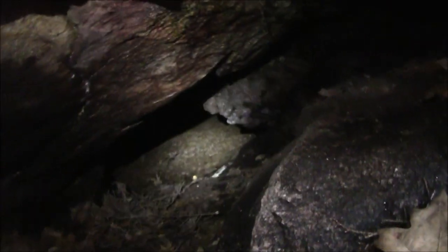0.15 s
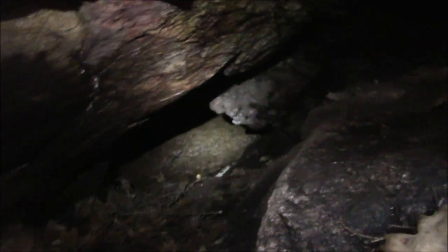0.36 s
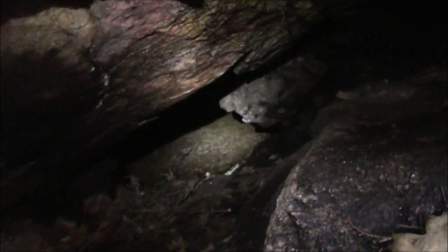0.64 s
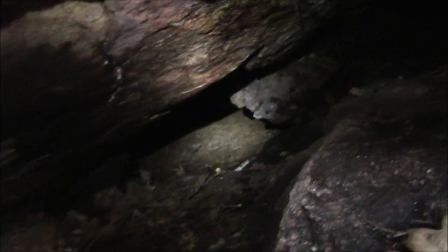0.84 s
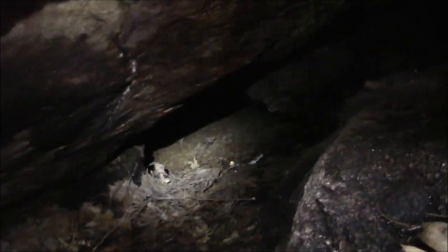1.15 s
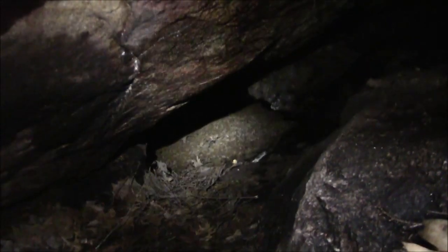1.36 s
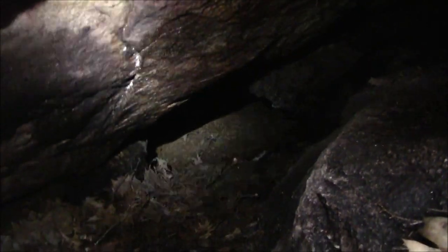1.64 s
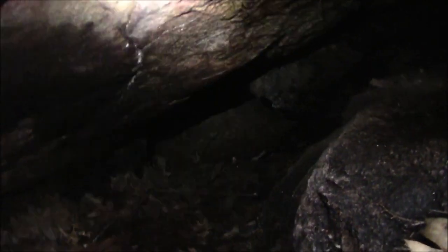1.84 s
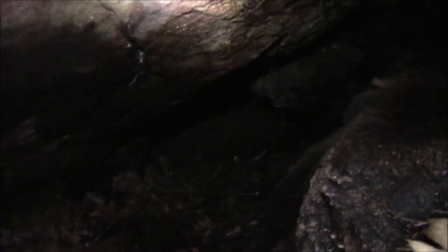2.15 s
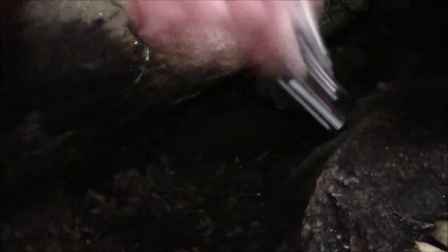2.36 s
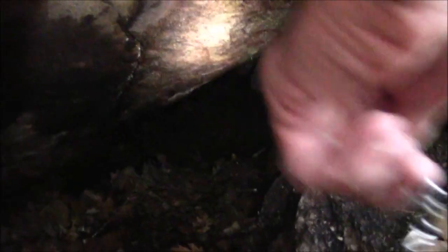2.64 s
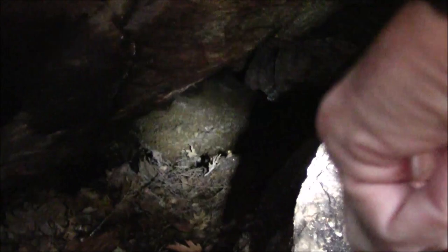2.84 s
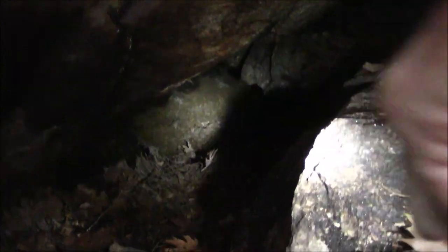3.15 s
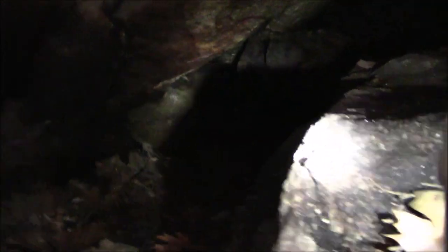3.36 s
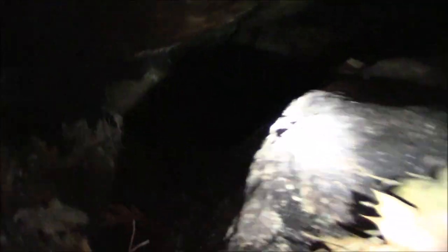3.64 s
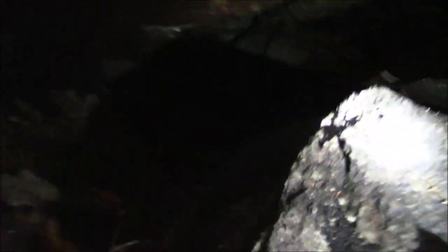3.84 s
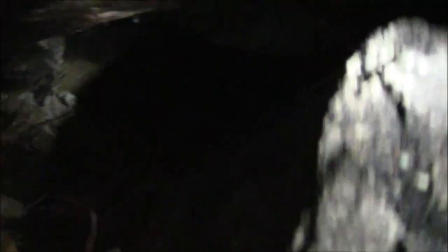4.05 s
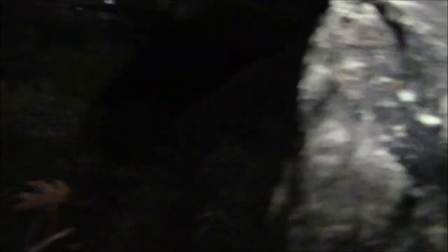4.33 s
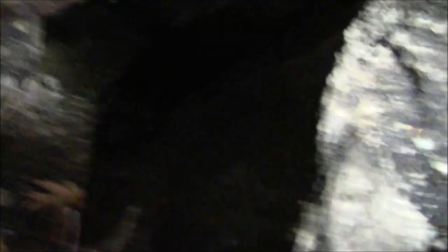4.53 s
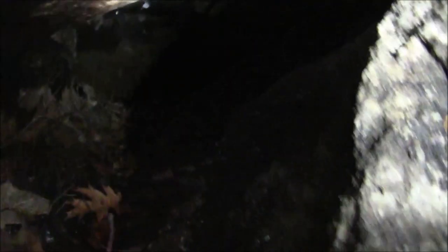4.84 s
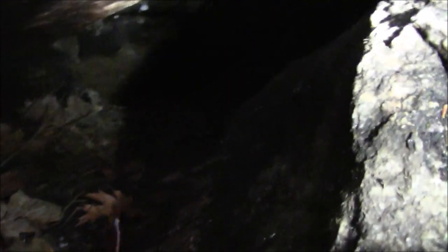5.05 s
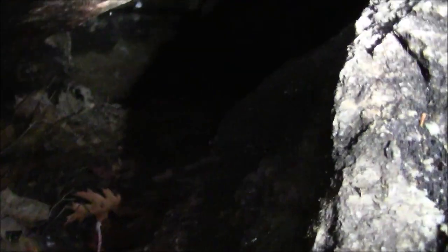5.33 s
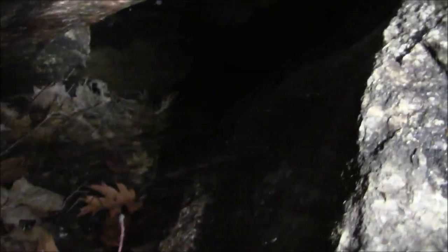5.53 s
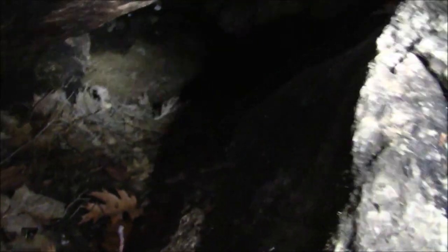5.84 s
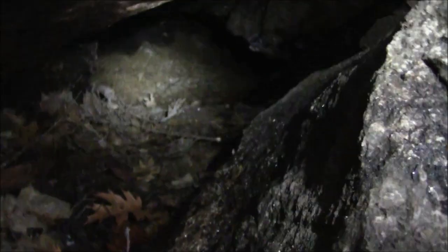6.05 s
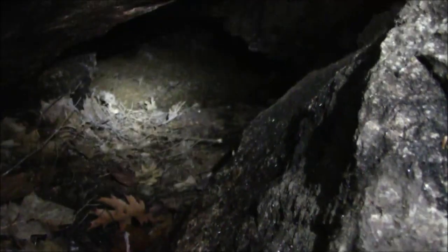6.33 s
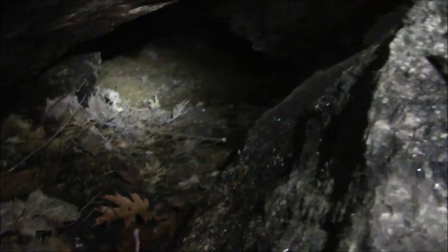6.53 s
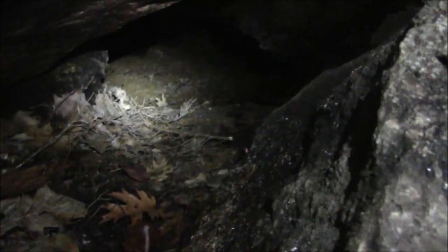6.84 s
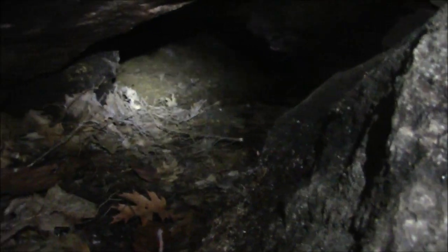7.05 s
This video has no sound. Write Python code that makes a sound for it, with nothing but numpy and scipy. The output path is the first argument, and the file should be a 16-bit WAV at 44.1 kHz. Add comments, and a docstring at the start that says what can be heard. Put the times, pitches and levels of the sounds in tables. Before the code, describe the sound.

A quiet, dull wash of woodland air runs throughout. Close to the microphone, dry leaves give a faint crackle and a few small snaps in the first half second, then stay almost still until about 1.6 s. From 1.9 to 2.4 s, short rustles bring brittle snaps, light hollow stick knocks and soft low thuds. Sharp little stem clicks keep popping until about 3.1 s while low rubbing grows. At 3.4 s the leaves are pushed hard: a loud, dense, crisp crush with hissy sliding, peaking near 3.85 s and continuing to about 4.35 s, with bright cracks, another hollow knock and heavy dull thumps, one leaning right near 4.1 s. It falls away by 4.7 s. Smaller crackles and snaps follow until 5.9 s, then sparse, thin ticks and faint stirring to 7.2 s. Rocks lend tight, brief reflections.

```python
"""At the mouth of a rock crevice in the woods, someone shifts about in dry leaves close by. Pressed leaves
crackle in swarms of tiny breaks, with a hiss where they slide over each other. Stems and stiff leaves snap
singly as short, ringing bursts; sticks knock as brief, fading tones. Soft thuds, of landing weight and of one
bump far to the right at 4.135 s, are made of a low tone and a puff of noise, and dull noise makes the
shuffling. The rocks add short echoes to the crackle, snaps and knocks; filtered noise is the steady wash of the
woods."""
import sys
import numpy as np
from scipy import signal
from scipy.fft import rfft, irfft, next_fast_len
from scipy.io import wavfile
from scipy.ndimage import uniform_filter1d

SR = 44100
rng = np.random.default_rng(int(sys.argv[2]) if len(sys.argv) > 2 else 0)


def store_pcm(level_fs):
    """Save levels as 16-bit WAV."""
    pcm = np.round(np.clip(level_fs, -1, 1) * 32767).astype(np.int16)
    wavfile.write(sys.argv[1], SR, np.atleast_2d(pcm).T)


N = 317079
TIME = np.arange(N) / SR

# tone of the distant woods: [f/Hz, relative level per hertz/dB]
WOODS_TONE = [(25, -14), (55, 0.5), (100, -6), (160, -1.5), (250, -9.5), (350, -7), (550, -11),
              (1000, -14.5), (2000, -20), (5000, -26), (10000, -30), (16000, -36)]
# stereo width of the woods: [f/Hz, side over mid/dB]
WOODS_WIDTH = [(60, -8), (200, -4), (1600, -6), (15000, -7)]
# low rubbing of the moving body: [t/s, level/dB]
SHUFFLE = [(0, -53), (1.3, -48), (1.7, -43.5), (2.3, -43), (3.3, -39), (4.1, -37), (4.45, -38.5),
           (4.7, -56), (7.19, -49.5)]
# tone of the rubbing: [f/Hz, relative level per hertz/dB]
GROUND_TONE = [(25, -2.5), (60, 0), (150, 0.5), (320, -3), (550, -13), (1200, -13), (4000, -47)]
# weight resting on the leaves, heaviest while the body moves across them: [t/s, crackle level/dB]
RESTING_WEIGHT = [(0.0, -50.5), (0.3, -53.5), (0.75, -59.5), (1.3, -60), (1.55, -52), (1.72, -52),
                  (2.07, -43.5), (2.5, -43), (3.36, -44), (3.48, -25), (3.8, -21.5), (4.0, -23.5),
                  (4.16, -22.5), (4.33, -29.5), (4.44, -36.5), (4.72, -42.5), (4.99, -50), (5.6, -55.5),
                  (7.19, -58.5)]
# separate shoves into the leaves:
# [start t/s, length/s, crackle level/dB, body over crackle/dB, fizz over crackle/dB]
SHOVES = [(0.093, 0.04, -49, -5, -14), (0.347, 0.094, -45.5, -2.5, -10), (1.618, 0.17, -45.5, -1.5, -9),
          (1.909, 0.036, -37.5, -1, -6.5), (1.958, 0.058, -28, -5, -7), (2.093, 0.22, -41, 3.5, -5),
          (2.282, 0.021, -34.5, -2, -1), (2.315, 0.092, -41, 0.5, -13), (2.601, 0.032, -35.5, -9, -6),
          (2.812, 0.074, -43, -7, -1), (3.16, 0.089, -46, -14, -2.5), (3.354, 0.11, -31.5, -3.5, -9),
          (3.462, 0.043, -24.5, -4.5, -11), (3.692, 0.052, -21, -5, -9), (3.843, 0.054, -15, -8.5, -5),
          (3.925, 0.032, -22, -2.5, -13), (4.006, 0.12, -21, -1, -3), (4.058, 0.032, -20.5, -2.5, -8),
          (4.469, 0.087, -33.5, -7, -4.5), (4.621, 0.024, -31, -7.5, -3.5), (4.682, 0.083, -40, -4.5, -5),
          (4.805, 0.089, -39, -15, -4.5), (4.903, 0.038, -33.5, -19, -1.5), (5.008, 0.052, -30.5, -11, -2),
          (5.078, 0.031, -36, -4.5, -6), (5.241, 0.059, -42, 1.5, -5.5), (5.406, 0.11, -44.5, 1, -5),
          (5.745, 0.056, -39, -4, -5), (5.814, 0.126, -35, 0.5, -3.5), (6.218, 0.03, -49, 3.5, -7),
          (6.502, 0.037, -44, 0, -6)]
# filter that colours the crackle: [f/Hz, gain/dB]
LEAF_TONE = [(120, -6.5), (220, 0.5), (450, 3.5), (900, 1.5), (1500, 1.5), (2100, 1), (4500, 4),
             (8500, 2.5), (13500, -0.5), (16000, -9.5)]
# filter on the side of leaves, stems and rubbing, against the mid: [f/Hz, gain/dB]
LEAF_WIDTH = [(100, -7), (300, -10), (700, -14), (1500, -17.5), (3000, -15.5), (7000, -10), (15000, -7)]
# the loudest stems and stiff leaves breaking, before a shared lift in level and a softening of brightness:
# [t/s, level/dB, main ring f/Hz, second ring f/Hz, brightness (treble over body)/dB, fade time of the break/s]
SNAPS = [(0.0587, -35, 7960, 11200, 4, 0.0015), (0.1212, -30, 5860, 950, -2, 0.003),
         (0.149, -36, 9150, 4480, 3, 0.0024), (0.3496, -30, 4070, 2580, -1, 0.0066),
         (0.52, -39.5, 3950, 2150, -8, 0.0013), (0.6007, -40.5, 4130, 5510, -15, 0.0038),
         (0.7757, -34, 4050, 8050, -8, 0.0017), (0.856, -39.5, 3740, 9600, 0, 0.0063),
         (1.1271, -41, 4600, 8960, -7, 0.0008), (1.3538, -35, 5600, 8800, 5, 0.00038),
         (1.5888, -39.5, 3880, 5680, -4, 0.0062), (1.9174, -29.5, 9730, 4820, 4, 0.0034),
         (2.0427, -29, 2350, 10250, -19, 0.0014), (2.1907, -24.5, 3030, 7750, -1, 0.0005),
         (2.273, -28.5, 8100, 13870, 13, 0.0014), (2.2978, -21.5, 2440, 8100, -0.5, 0.0017),
         (2.3275, -27, 1580, 4220, -29, 0.00042), (2.3528, -29, 10080, 4450, 16, 0.0016),
         (2.3924, -29, 6760, 9220, 3, 0.0022), (2.416, -17, 4800, 13300, 6.5, 0.0018),
         (2.5028, -30.5, 4130, 8700, 8, 0.0017), (2.566, -24.5, 5600, 12320, 7, 0.00068),
         (2.6233, -18, 4960, 8800, -1.5, 0.0015), (2.6402, -25.5, 7920, 13950, 15, 0.00043),
         (2.71, -26.5, 5510, 9400, 4, 0.00036), (2.7858, -20, 11200, 6130, 16, 0.00023),
         (2.8442, -26.5, 3500, 7960, 6, 0.0032), (2.8738, -28, 7750, 12580, 7.5, 0.0012),
         (2.9328, -29.5, 5170, 12060, 10, 0.0035), (2.9797, -19, 9300, 3670, 4, 0.00052),
         (3.0243, -26.5, 3730, 13700, -8, 0.0015), (3.0341, -26.5, 11280, 13780, 8, 0.0005),
         (3.3699, -22.5, 7640, 13090, 4, 0.0035), (3.4718, -15.5, 1190, 4930, 5, 0.0041),
         (3.588, -12, 5230, 8500, -2, 0.0016), (3.6213, -15.5, 2860, 4910, -22.5, 0.0012),
         (3.916, -16, 4230, 8180, -5, 0.00086), (4.1035, -13.5, 8790, 10680, 1, 0.0022),
         (4.2008, -15.5, 7320, 11000, 5, 0.0038), (4.3065, -16, 9040, 10680, 5, 0.0098),
         (4.3501, -10.5, 4400, 7840, 5, 0.0069), (4.423, -18.5, 7050, 5360, 5, 0.00017),
         (4.4813, -19.5, 7340, 4500, 8, 0.00053), (4.523, -21.5, 6460, 10590, -3, 0.005),
         (4.8067, -31, 1000, 6630, -4, 0.0012), (4.9303, -31.5, 11800, 1850, -10, 0.0028),
         (4.9547, -26, 10500, 11890, 20, 0.002), (4.9796, -23, 11400, 3860, 4, 0.00051),
         (5.0153, -23, 14300, 4910, 7, 0.0028), (5.4366, -33.5, 1180, 5200, -27, 0.0013),
         (5.54, -36, 5250, 9130, -3.5, 0.002), (5.943, -28, 10680, 950, 13, 0.0029),
         (6.2136, -33, 1170, 9820, -7, 0.0029), (6.598, -32.5, 10600, 8900, -1, 0.0015),
         (6.9888, -34.5, 4860, 9650, -3, 0.0013)]
# sticks knocking hollowly, before a shared lift in level: [t/s, starting level/dB, ring f/Hz]
KNOCKS = [(0.122, -35, 700), (1.944, -26.5, 840), (1.968, -24, 960), (1.981, -27, 840), (4.353, -17.5, 800),
          (5.942, -27.5, 720)]
# weight landing on the ground, and at 4.135 s a bump heard far to the right: [t/s, level of the tone before its
# rise and fade/dB, f/Hz, left over right/dB]
THUDS = [(2.232, -26.5, 330, 1), (2.276, -22, 250, 0.0), (2.283, -21, 96, -2), (2.309, -28, 72.7, -2.0),
         (3.71, -17, 468, 0.0), (4.135, -11, 165, -22.5), (4.352, -17.5, 189, -7), (4.696, -25, 185, 0),
         (4.928, -29, 430, -2)]
# echoes from the rock faces: [delay t/s, level/dB]
ROCK_ECHOES = [(.0027, -27), (.0062, -27)]
# lean of everything near, to the right where negative: [f/Hz, left over right/dB]
NEAR_LEAN = [(300, -.5), (2000, -.6), (6000, -1.5), (13000, -2.3)]

BODY_EDGE_HZ, FIZZ_EDGE_HZ, CUT_HZ = 2500, 9000, 16000
# resting leaves: body and fizz over crackle at a middling weight; light stirring is duller than a hard crush
MIDDLING_DB, BODY_DB, FIZZ_DB, BODY_DB_PER_DB = -43, -1, -6.5, -0.1541
# a shove builds over this share of its length, and dies away with this time constant
SHOVE_RISE_SHARE, SHOVE_RELEASE_S = 0.29, .014
# lesser stems: mean number a second, level at a middling weight before the shared lift, growth with weight
STRAYS_PER_S, STRAY_DB, STRAY_DB_PER_DB = 7.2, -34, 0.6858


def amp(db):
    """Decibels to gain."""
    return 10 ** (np.asarray(db) / 20)


def unit(x):
    """Scales a mid-side pair so that the mid has an average (rms) level of 1."""
    return x / np.sqrt(np.mean(x[0] ** 2) + 1e-20)


def read(points, hz):
    """Reads between the points of a table, spacing frequencies as the ear does (by ratio)."""
    f, value = np.transpose(points)
    return np.interp(np.log(hz + 1), np.log(f + 1), value)


def shaped(x, gain):
    """Filters x by a gain given as a function of frequency."""
    size = next_fast_len(x.shape[-1] + 2048)
    spectrum = rfft(x, size) * gain(np.fft.rfftfreq(size, 1 / SR))
    return irfft(spectrum, size)[..., :x.shape[-1]]


def coloured(pair, tone, width):
    """Filters a mid-side pair for tone, and its side alone for stereo width."""
    def gain(hz):
        mid_and_side = np.array([np.ones_like(hz), amp(read(width, hz))])
        return amp(read(tone, hz)) * mid_and_side
    return unit(shaped(pair, gain))


def drift(rate_hz):
    """Slow random wander of rms 1, mostly below the given rate."""
    return unit(shaped(rng.standard_normal((1, N)), lambda hz: 1 / (1 + (hz / rate_hz) ** 4)))[0]


def add(mix, s, sound):
    """Adds a sound to the mix at a time in seconds."""
    part = mix[:, max(round(s * SR), 0):][:, :sound.shape[1]]
    part += sound[:, :part.shape[1]]


def woods(level_db=-44.5):
    """The steady wash of distant air: noise filtered to a dull tone."""
    return amp(level_db) * coloured(rng.standard_normal((2, N)), WOODS_TONE, WOODS_WIDTH)


def shuffle(lumpy_db=2):
    """Dull, uneven rubbing while the body moves: low noise whose level wanders."""
    level = np.interp(TIME, *np.transpose(SHUFFLE))
    rubbing = coloured(rng.standard_normal((2, N)), GROUND_TONE, LEAF_WIDTH)
    return amp(level + lumpy_db * drift(29)) * rubbing


def weight(t):
    """Crackle level in dB that the resting weight alone makes."""
    return np.interp(t, *np.transpose(RESTING_WEIGHT))


def pressure():
    """Shoves rise, hold and let go on top of the resting weight; gives crackle, and body and fizz over it, in dB."""
    rest = weight(TIME)
    rest_body = rest + BODY_DB + BODY_DB_PER_DB * (rest - MIDDLING_DB)
    power = amp([rest, rest_body, rest + FIZZ_DB]) ** 2
    t = np.arange(SR // 2) / SR
    for s, length, db, body_db, fizz_db in SHOVES:
        rise = np.minimum(t / (SHOVE_RISE_SHARE * length), 1)
        release = np.exp(-np.maximum(t - length, 0) / SHOVE_RELEASE_S)
        add(power, s, np.outer(amp([db, db + body_db, db + fizz_db]), rise * release) ** 2)
    level, body, fizz = 10 * np.log10(power)
    return level, body - level, fizz - level


def fracture(rings, length, q, tail_db, tail_s):
    """One break: a sharp burst that sounds its rings (f/Hz, level/dB) and scatters briefly through the litter."""
    t = np.arange(1500) / SR
    envelope = np.exp(-t / max(length, 1e-5)) + amp(tail_db) * np.exp(-t / tail_s)
    random_signs = rng.choice([-1., 1.], (2, len(t)))
    burst = envelope * random_signs * rng.uniform(0.66, 1, (2, len(t)))
    sound = burst.copy()
    for hz, db in rings:
        resonance = signal.iirpeak(min(hz, CUT_HZ), max(q, 1), SR)
        sound += amp(db) * signal.lfilter(*resonance, burst)
    return sound / np.linalg.norm(sound, axis=1, keepdims=True)


def swarm(per_s, spread_db, cap, turn_db, count=28):
    """Many leaves, each with its own ring, take turns breaking: mostly tiny cracks, a few large."""
    at = np.flatnonzero(rng.random(N) < per_s / SR)
    size = amp(spread_db * np.minimum(rng.exponential(1, N), cap))
    leaf = rng.integers(0, count, N)
    out = np.zeros((2, N + 1500))
    strain = drift(10.3)  # every leaf reads this wander from its own starting point
    for k, hz in enumerate(np.geomspace(2000, 14000, count)):
        length = .00035 * rng.uniform(.4, 2)
        grain = fracture([(hz, 8)], length, q=3, tail_db=-17, tail_s=.004)
        for i in at[leaf[at] == k]:
            turn = amp(turn_db * strain[(i + k * N // count) % N])
            out[:, i:i + grain.shape[1]] += size[i] * turn * grain
    return out[:, :N]


def sliding(patchy_db):
    """Leaves rubbing on each other make a hiss whose resonances come and go as the contacts change."""
    z = signal.stft(rng.standard_normal((2, N)), nperseg=256)[2]
    patches = rng.standard_normal(z.shape[1:])
    # smooth across frequency (axis 0) and time (axis 1)
    for axis, size in [(0, 3), (0, 4), (1, 10), (1, 14)]:
        patches = uniform_filter1d(patches, size, axis)
    patchy = z * amp(patchy_db * patches / patches.std())
    return unit(signal.istft(patchy, nperseg=256)[1][:, :N])


def rustle(clump_db=0.15):
    """Harder pressure breaks more leaves a second; leaves sliding over each other fill the gaps."""
    level, body, fizz = pressure()
    per_s = np.clip(2400 * amp(.25 * (level + 30)), 50, 5000)
    # the division stops a busier swarm from being louder by number alone
    grains = unit(swarm(per_s, spread_db=4.4, cap=4.4, turn_db=2) / np.sqrt(per_s))
    sound = grains + amp(-2) * sliding(patchy_db=2.8)
    sound = coloured(sound * amp(clump_db * drift(53)), LEAF_TONE, LEAF_WIDTH)
    # split into low body, crisp middle and high fizz
    low = shaped(sound, lambda hz: 1 / (1 + (hz / BODY_EDGE_HZ) ** 6))
    high = shaped(sound, lambda hz: 1 / (1 + (FIZZ_EDGE_HZ / (hz + 1)) ** 10))
    # more fizz leaves less power for the middle
    crisp = unit(sound - low - high) * np.sqrt(np.clip(1 - amp(fizz) ** 2, .1, 1))
    # light stirring is scattered, a hard crush comes from one spot
    spread = np.array([np.ones(N), amp(-.2 * (level + 35))])
    return amp(level) * (crisp + amp(body) * unit(low) * spread + amp(fizz) * unit(high))


def strays(spread_db=1.5, low_hz=3000, high_hz=8000, overtone=1.63, bright_spread_db=6, length_s=0.0022):
    """Rows like SNAPS for lesser stems breaking by chance: thickness varies, and few break under a light touch."""
    chance = np.cumsum(amp(np.minimum(weight(TIME), MIDDLING_DB)))
    count = max(round(STRAYS_PER_S * N / SR), 1)
    when, force, thin, tough = rng.random((count, 4)).T
    s = np.interp(when, chance / chance[-1], TIME)
    db = STRAY_DB + STRAY_DB_PER_DB * (weight(s) - MIDDLING_DB) + spread_db * (2 * force - 1)
    hz = low_hz * (high_hz / low_hz) ** thin
    bright_db = bright_spread_db * (2 * thin - 1)
    return list(zip(s, db, hz, overtone * hz, bright_db, length_s * (.5 + tough)))


def snaps(lift_db=23, tilt=0.46, first_give_db=-14):
    """Each stem gives a little, then breaks with its own rings; thin ones are brighter."""
    out = np.zeros((2, N))
    for s, db, hz, second_hz, bright_db, length in list(SNAPS) + strays():
        # a long tear runs through many fibres and rings less clearly
        ring_db = 7 - 1500 * length
        crack = fracture([(hz, ring_db), (second_hz, ring_db)], length, q=6, tail_db=-20, tail_s=.004)
        treble_db = tilt * bright_db  # raises the treble and lowers the body alike
        tone = [(100, -29), (600, -1 - treble_db), (1500, -treble_db),
                (4500, 2.5), (11000, treble_db - 3.5), (16000, treble_db - 8)]
        crack = coloured(crack, tone, LEAF_WIDTH)
        crack *= amp(db + lift_db) / np.linalg.norm(crack[0])
        add(out, s - rng.uniform(.001, .003), amp(first_give_db) * crack)
        add(out, s, crack)
    return out


def knocks(lift_db=4, t60_s=0.026):
    """A stick is tapped and rings briefly on one tone, falling 60 dB in t60_s, in the middle of the stereo."""
    out, t = np.zeros((2, N)), np.arange(SR // 10) / SR
    for s, db, hz in KNOCKS:
        ring = amp(db + lift_db - 60 * t / t60_s) * np.sin(2 * np.pi * hz * t)
        add(out, s, np.outer([1, 0], ring))
    return out


def thuds(grit_db=-5, rise_s=0.0016, push_t60_s=0.051, puff_t60_s=0.094, scatter_db=-2):
    """A damped push into soft ground, or a bump off to one side, with a dull puff of noise around the same
    pitch that settles more slowly."""
    out, t = np.zeros((2, N)), np.arange(SR // 4) / SR
    for s, db, hz, pan_db in THUDS:
        aside = (amp(pan_db) - 1) / (amp(pan_db) + 1)
        noise = rng.standard_normal((2, len(t)))
        litter = unit(shaped(noise, lambda f: (f / hz) ** 2 / (1 + (f / hz) ** 3.5)))
        puff = litter * amp(grit_db - 60 * t / puff_t60_s)
        push = np.sin(2 * np.pi * hz * t) * amp(-60 * t / push_t60_s)
        mid = push + puff[0]
        side = aside * (mid + amp(scatter_db) * puff[1])  # the further a thud sits to one side, the wider its scatter
        add(out, s, np.array([mid, side]) * amp(db) * (1 - np.exp(-t / rise_s)))
    return out


def crevice(pair, tail_db=-17, t60_s=0.061):
    """Near rock faces return single echoes, then a short blurred tail that falls 60 dB in t60_s."""
    t = np.arange(SR // 4) / SR
    after_first_echo = t > ROCK_ECHOES[0][0]
    tail = rng.standard_normal((2, len(t))) * amp(-60 * t / t60_s) * after_first_echo
    tail *= amp(tail_db) / np.linalg.norm(tail[0]) * np.array([[1], [.6]])
    out = pair + signal.fftconvolve(pair[:1], tail, axes=1)[:, :N]
    for delay, db in ROCK_ECHOES:
        add(out, delay, amp(db) * pair)
    return out


def left_right(pair, lean):
    """Turns mid and side into left and right, leaning to one side by half the lean up and half down."""
    both = np.array([pair[0] + pair[1], pair[0] - pair[1]])
    return shaped(both, lambda hz: amp(np.array([[.5], [-.5]]) * read(lean, hz)))


def scene():
    """Leaves and footing near the rocks, over the wash of the woods."""
    echoing = crevice(rustle() + snaps() + knocks())
    near = echoing + thuds() + shuffle()
    woods_lean = [(100, -.4), (1500, -1.1)]  # f/Hz, left over right/dB
    return left_right(near, NEAR_LEAN) + left_right(woods(), woods_lean)


def record(dry):
    """Soft overload rounds the highest peaks, then a filter removes the top of the treble."""
    held = 1.1 * np.tanh(dry / 1.1)
    low_pass = signal.firwin(401, CUT_HZ, window=("kaiser", 9), fs=SR)
    return signal.oaconvolve(held, low_pass[None], "same")


dry = scene()
out = record(dry)
store_pcm(out)
```